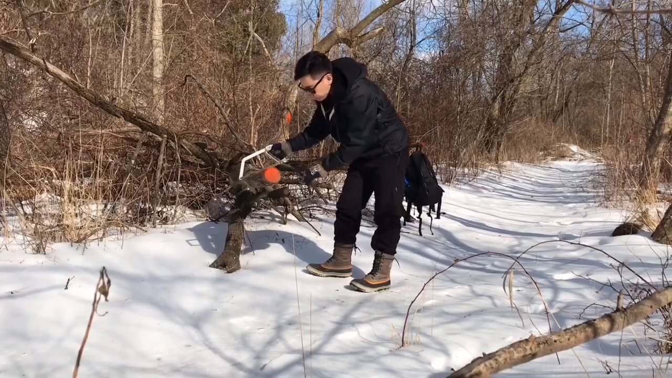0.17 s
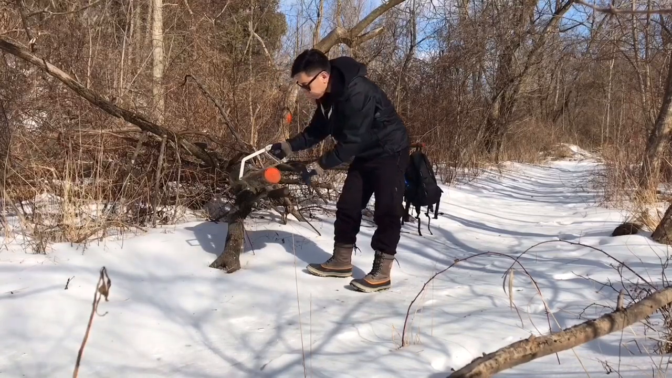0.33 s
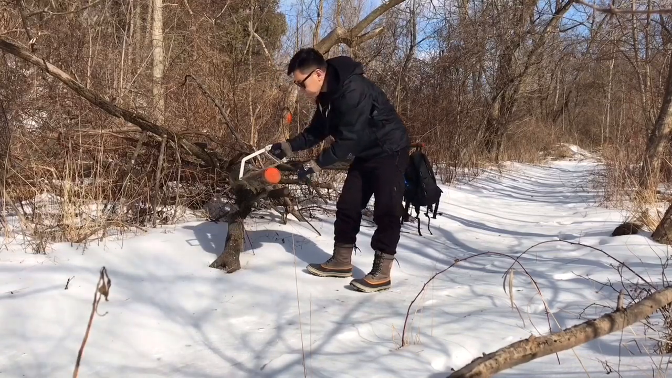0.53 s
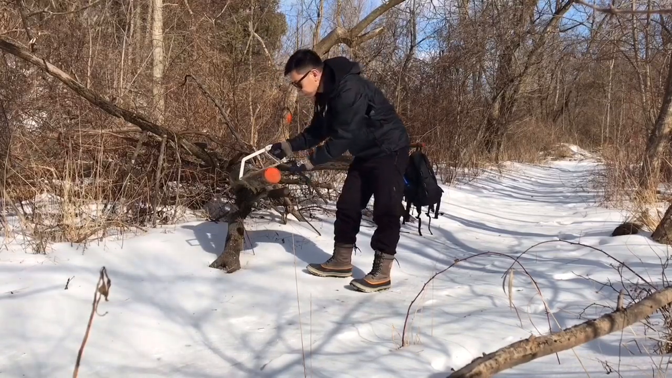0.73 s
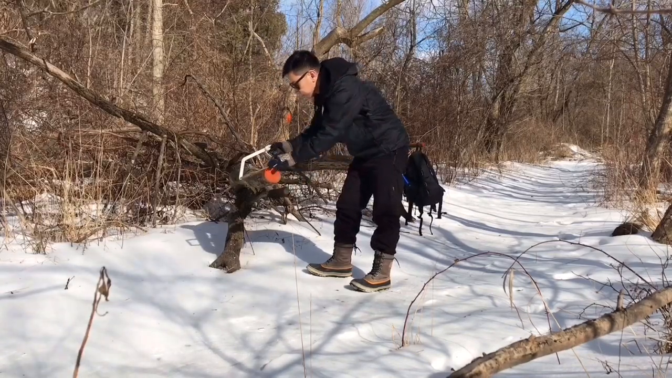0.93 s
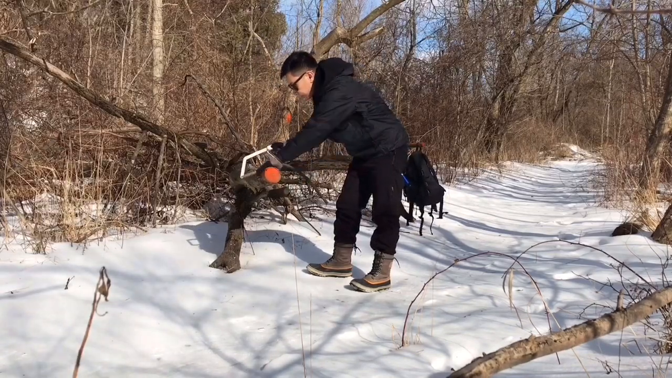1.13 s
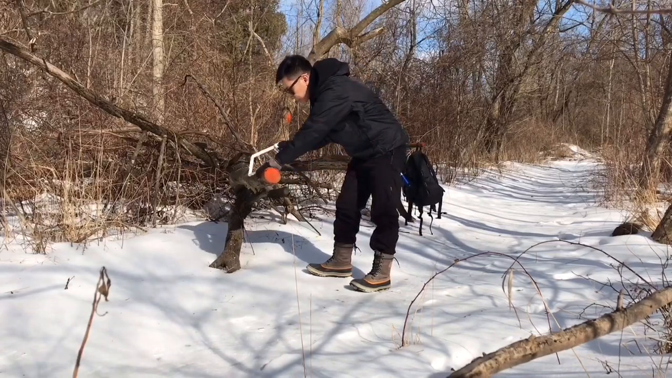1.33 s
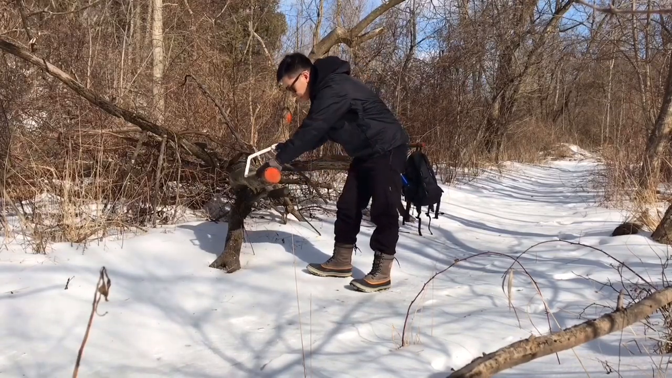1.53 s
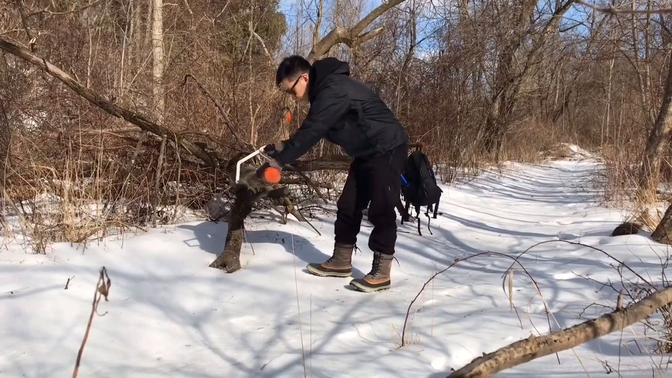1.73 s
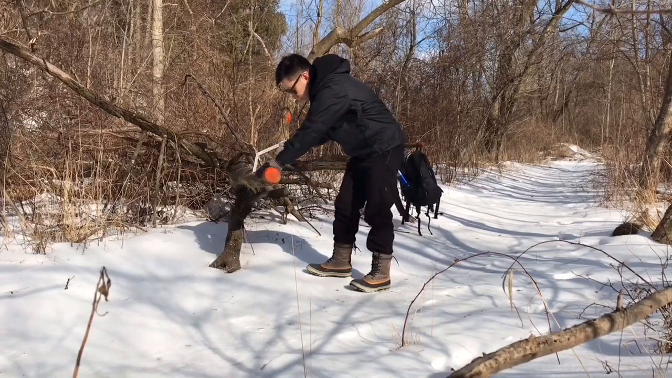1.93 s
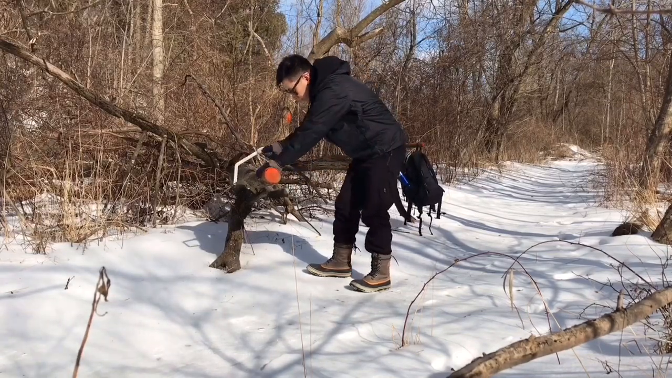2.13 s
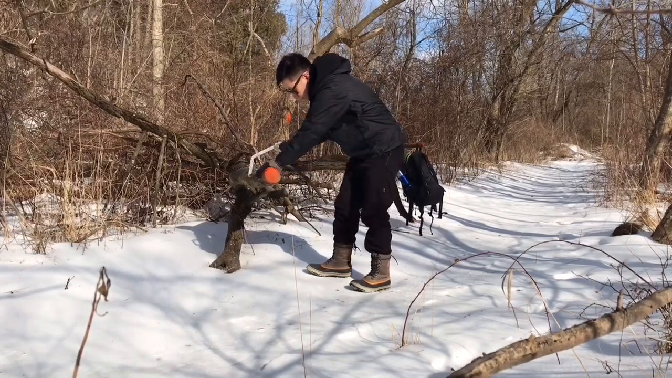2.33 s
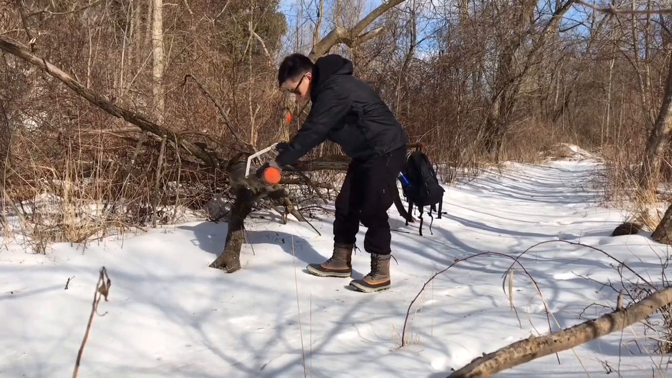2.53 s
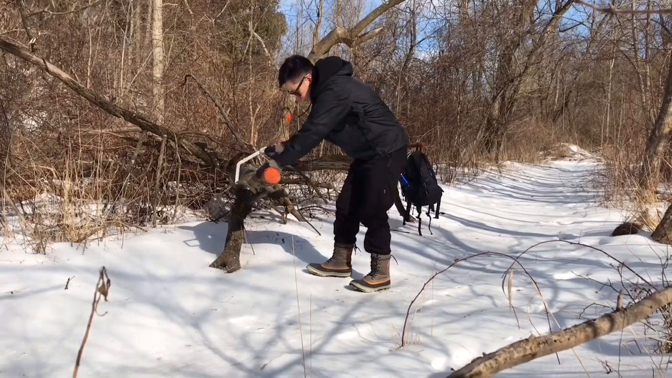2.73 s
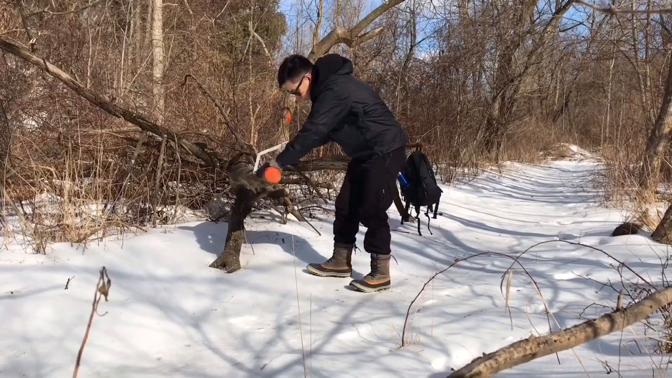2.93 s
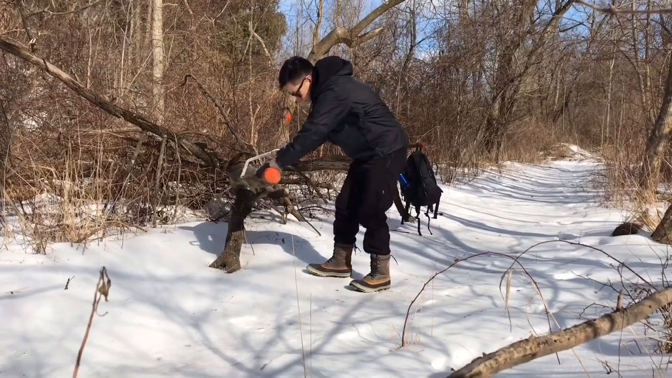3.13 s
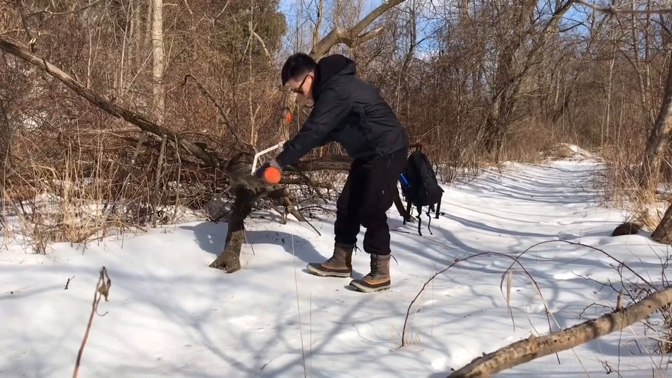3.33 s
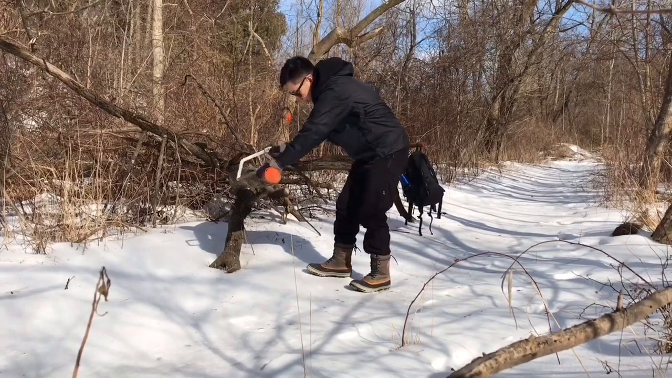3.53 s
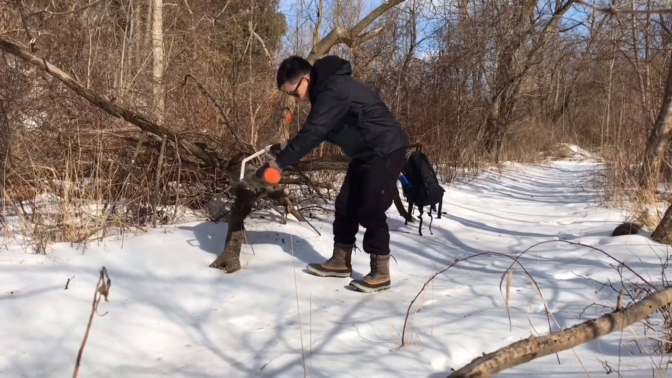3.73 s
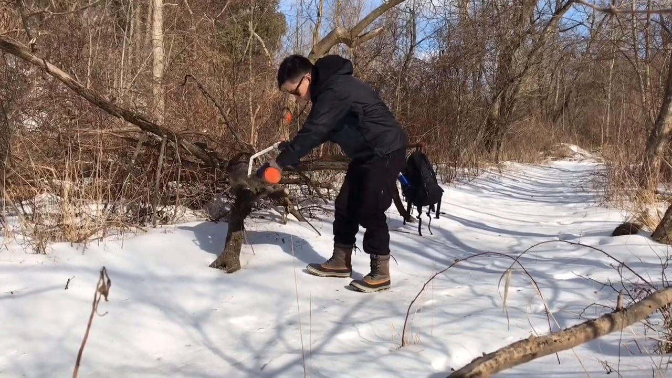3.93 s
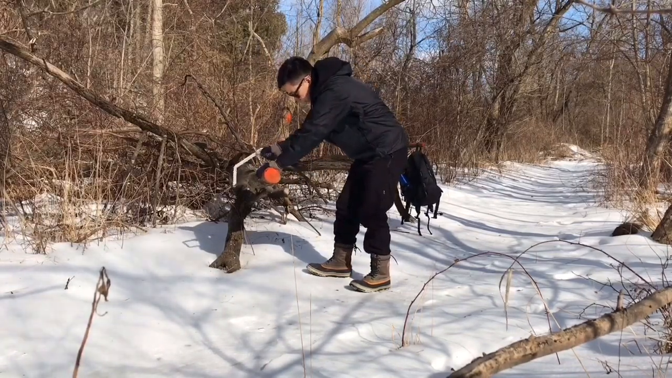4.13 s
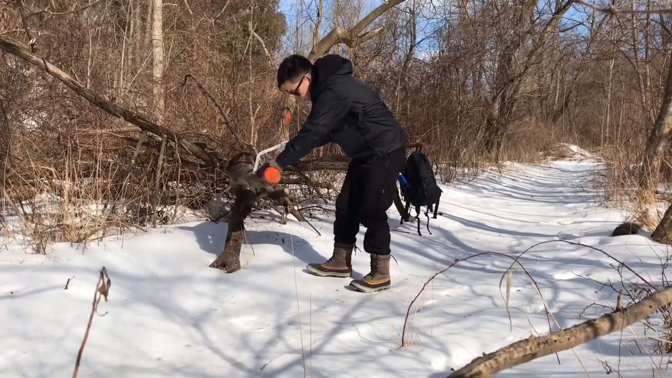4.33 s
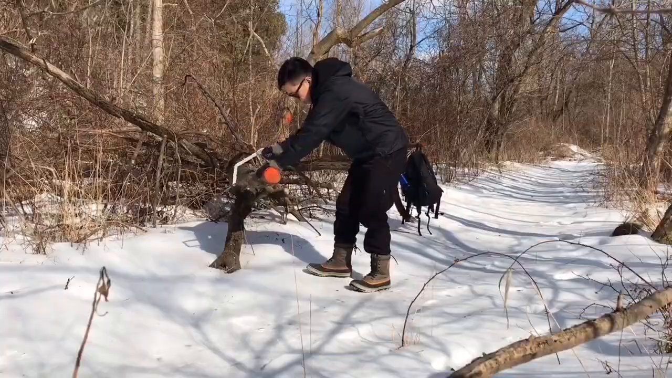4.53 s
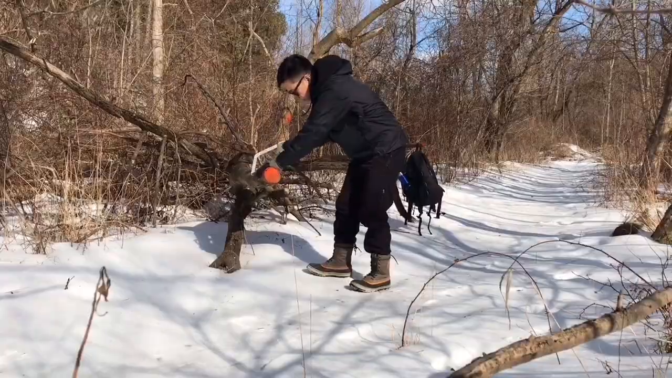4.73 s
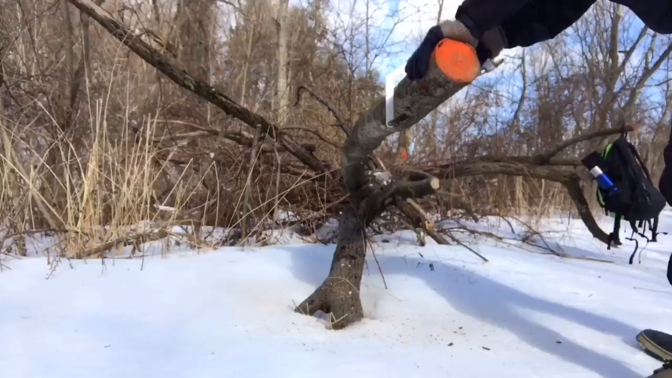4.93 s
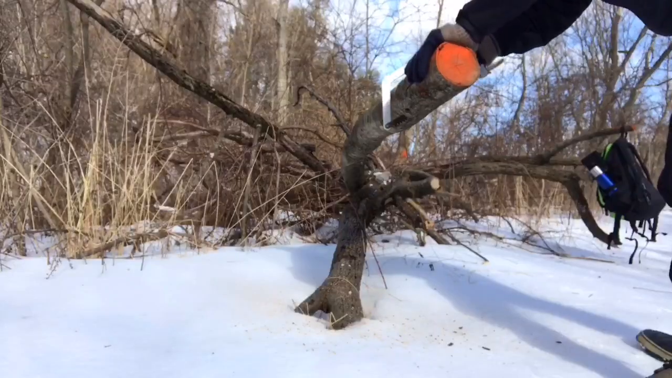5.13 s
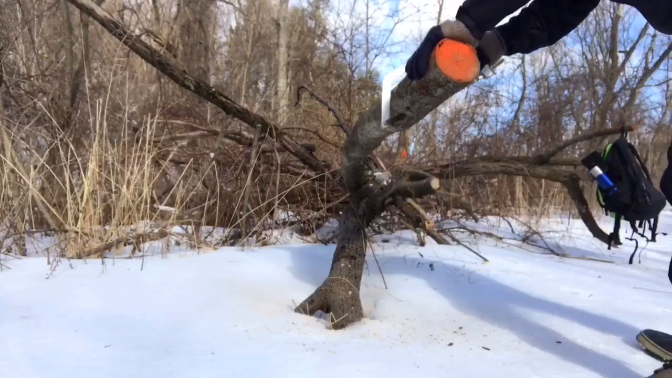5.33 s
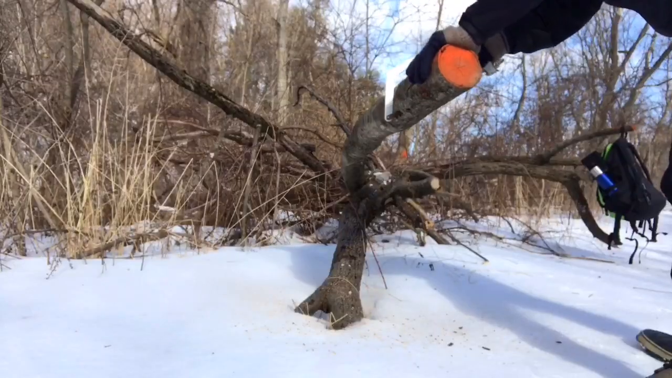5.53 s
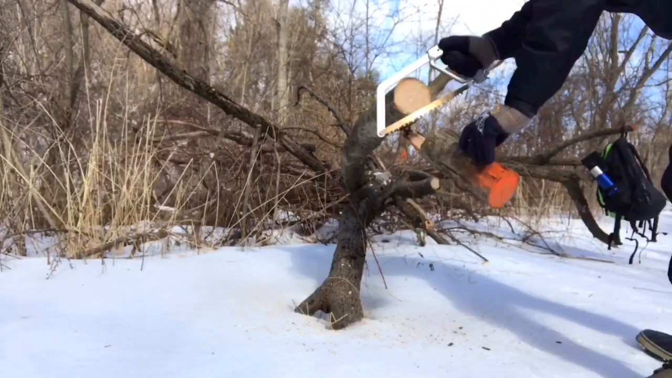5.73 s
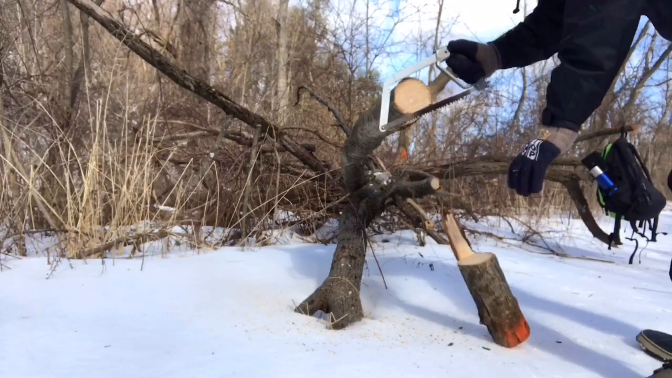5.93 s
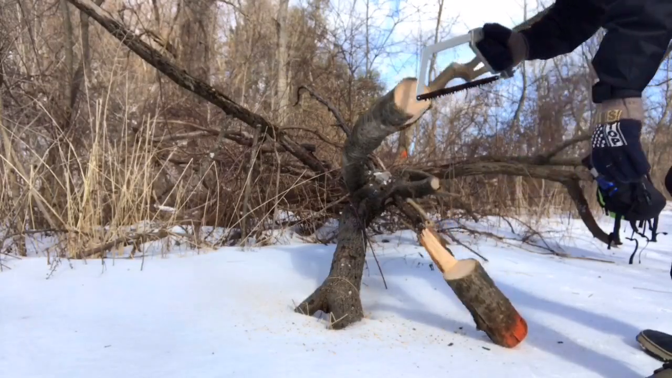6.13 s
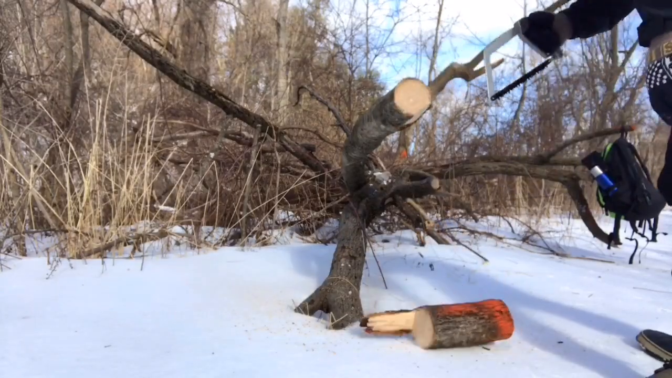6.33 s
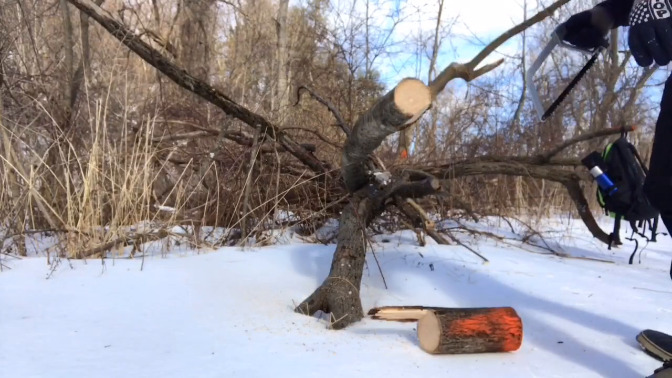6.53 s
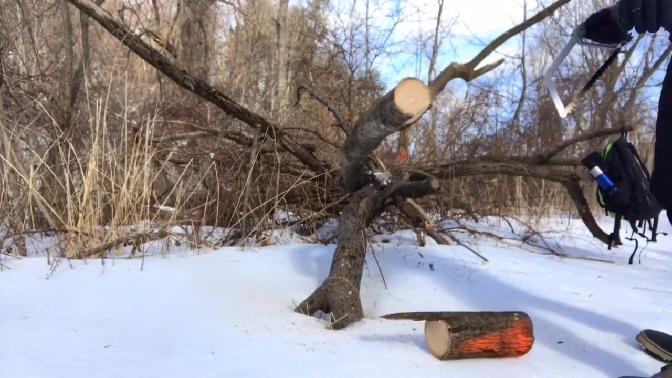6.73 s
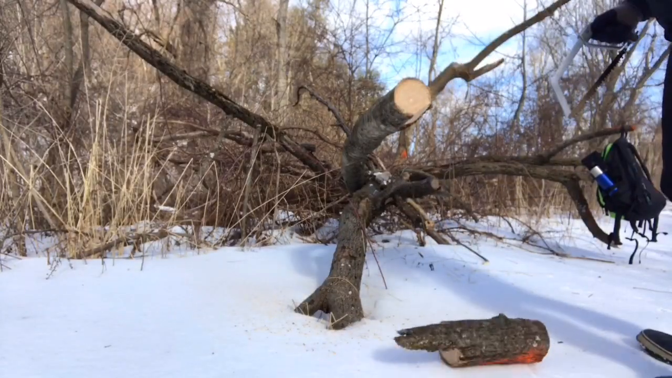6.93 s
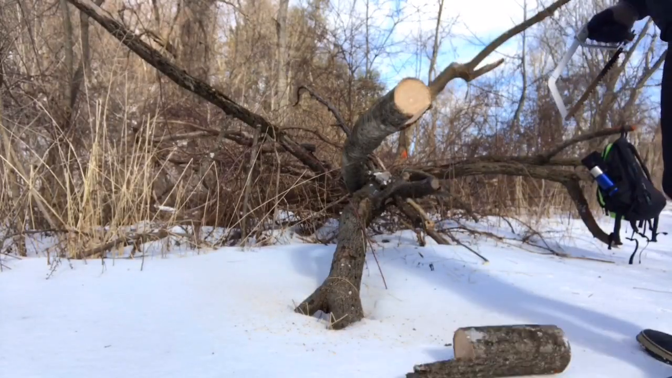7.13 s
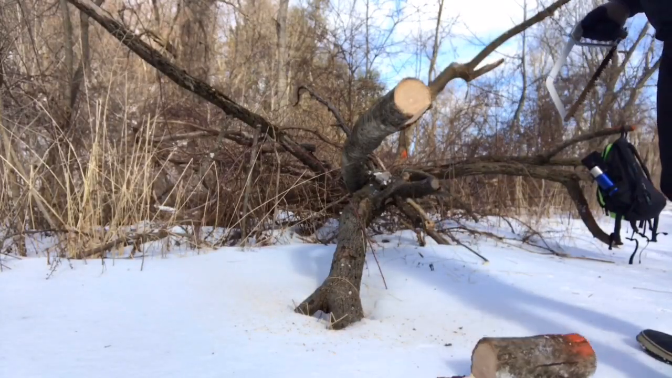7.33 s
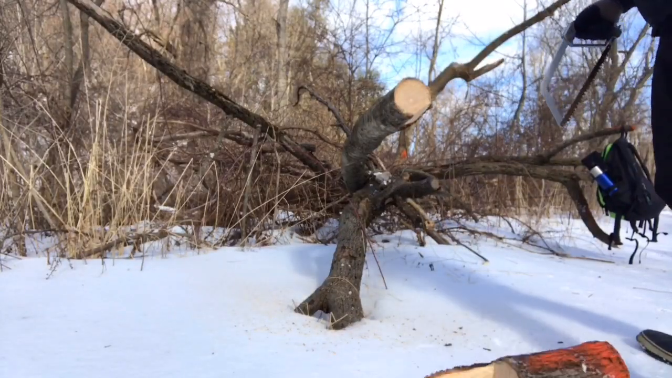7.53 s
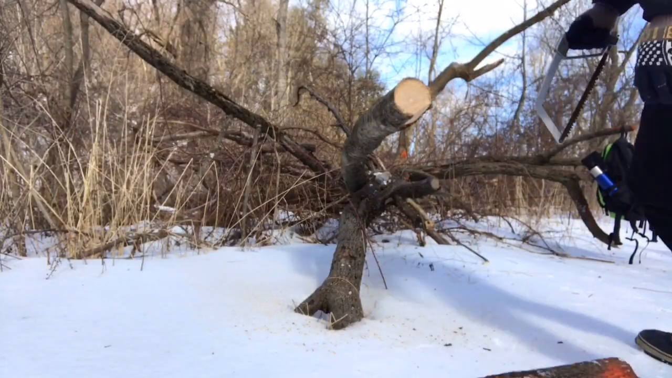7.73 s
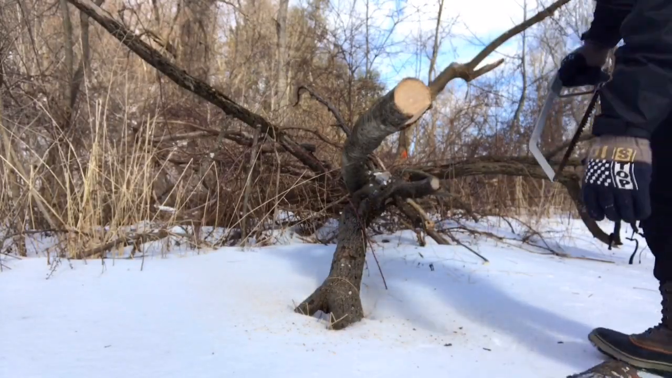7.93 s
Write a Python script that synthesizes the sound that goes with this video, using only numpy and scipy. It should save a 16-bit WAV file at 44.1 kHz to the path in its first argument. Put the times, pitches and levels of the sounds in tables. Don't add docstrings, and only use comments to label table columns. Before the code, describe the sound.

Quiet outdoor air with low wind rumble and a distant road, then a hand saw bites dry wood in fast, even, metallic strokes, with a brief pause midway. Closer, the blade binds with scrapes and hollow knocks, and the branch splinters and snaps very loudly. The log thuds onto snow, bounces and rolls with hiss and small cracks. Close dry microphone, faint woodland tail.

```python
import sys
import numpy as np
from scipy import signal
from scipy.fft import rfft, irfft, next_fast_len
from scipy.io import wavfile
from scipy.ndimage import map_coordinates

SR = 44100
rng = np.random.default_rng(int(sys.argv[2]) if len(sys.argv) > 2 else 0)


def wav_record(signal):
    frames = np.transpose(np.atleast_2d(signal))
    bounded = np.clip(frames, -1, 1)
    quanta = np.round(bounded * 32767).astype(np.int16)
    wavfile.write(sys.argv[1], SR, quanta)


def elevation(decibels):
    levels = np.asarray(decibels, float)
    return 10 ** (levels / 20)


N = 355887
TIME = np.arange(N) / SR


def unit(x):
    return x / np.sqrt(np.mean(x ** 2) + 1e-20)


def along(points, hz):
    f, v = np.transpose(points)
    return np.interp(np.log(hz + 1), np.log(f + 1), v)


def curves(tables, fade_s):
    rows = []
    for table in tables:
        first, last = table[0], table[-1]
        rows.append((first[0] - fade_s, first[1] - 30, *first[2:]))
        rows += table
        rows.append((last[0] + fade_s, last[1] - 30, *last[2:]))
    s, *columns = np.transpose(sorted(rows))
    return [np.interp(TIME, s, column) for column in columns]


def wobble(rate_hz):
    knots = rng.standard_normal(int(N * rate_hz / SR) + 4)
    return map_coordinates(knots, [TIME * rate_hz])


def filtered(x, response):
    m = next_fast_len(len(x) + SR // 4)
    return irfft(rfft(x, m) * response(np.fft.rfftfreq(m, 1 / SR)), m)[:len(x)]


def tinted(x, spectrum):
    return unit(filtered(x, lambda hz: elevation(along(spectrum, hz))))


def resonant(x, peaks):
    def response(hz):
        total = 0
        for k, (centre_hz, width_hz, db) in enumerate(peaks):
            damping = 1j * hz * width_hz
            total = total + (-1) ** k * elevation(db) * damping / (centre_hz ** 2 - hz ** 2 + damping)
        return total
    return unit(filtered(x, response))


def grit(rate_hz, spread_db):
    hits = rng.random(N) < rate_hz / SR
    return hits * rng.standard_normal(N) * elevation(spread_db * rng.standard_normal(N))


def band(x, lo_hz, hi_hz):
    edges_hz = [lo_hz, min(hi_hz, SR / 2.1)]
    return signal.sosfilt(signal.butter(2, edges_hz, "band", fs=SR, output="sos"), x)


# (time [s], rumble level [dB], road level [dB])
AIR_LEVELS = [(0.0, -54, -61), (0.36, -53, -61), (2.43, -57, -59), (3.46, -53, -59), (4.0, -54, -59),
              (4.92, -52, -58), (5.06, -47, -59), (5.33, -48, -62), (5.64, -46, -61), (5.98, -51, -60),
              (6.25, -49, -59), (6.59, -52, -61), (6.85, -49, -62), (7.53, -51, -63), (7.8, -54, -57),
              (8.07, -49, -54)]
# (frequency [Hz], level [dB])
RUMBLE_SPECTRUM = [(15, -36), (25, -6), (54, 0), (108, -3), (156, -14), (194, -15), (216, -22), (260, -19),
                   (340, -49), (570, -120)]
# (frequency [Hz], level [dB])
ROAD_SPECTRUM = [(82, -30), (140, 0), (217, -10), (303, -8), (488, -18), (550, -14), (726, -19), (851, -15),
                 (1170, -17), (1400, -26), (1880, -24), (2790, -37), (16000, -54)]
# (time [s], level [dB])
HUM_LEVELS = [(4.8, -57), (4.86, -51), (5.22, -45), (5.33, -51), (5.45, -47), (6.41, -51), (6.49, -61),
              (6.56, -52), (6.98, -47), (7.12, -50), (7.62, -51), (7.67, -56), (7.98, -48), (8.07, -51)]


def air():
    rumble_db, road_db = curves([AIR_LEVELS], fade_s=.1)
    hum_db, = curves([HUM_LEVELS], fade_s=.05)
    rumble = unit(elevation(2.5 * wobble(9)) * tinted(rng.standard_normal(N), RUMBLE_SPECTRUM))
    road = elevation(.7 * wobble(3)) * tinted(rng.standard_normal(N), ROAD_SPECTRUM)
    hum_hz = 51 + 3 * wobble(8)
    hum = np.sqrt(2) * np.sin(2 * np.pi * np.cumsum(hum_hz) / SR)
    return elevation(rumble_db + 1.5) * rumble + elevation(road_db + 1.5) * road + elevation(hum_db - 1.5) * hum


# (frequency [Hz], t60 [s])
WOODS_DECAY = [(200, .5), (2000, .5), (12000, .25)]


def woods(x):
    hz, t, z = signal.stft(rng.standard_normal(SR // 2), SR, nperseg=256)
    decay = elevation(-60 * t / along(WOODS_DECAY, hz)[:, None])
    tail = signal.istft(z * decay, SR, nperseg=256)[1]
    delayed = np.pad(x, (300, 0))
    return signal.fftconvolve(delayed, tail / np.linalg.norm(tail))[:N]


# (time [s], hiss level [dB], body over hiss [dB])
SCRAPES = [
    [(4.965, -65, -4), (5.059, -65, 25), (5.135, -65, -7), (5.165, -66, 21), (5.201, -68, -8),
     (5.241, -70, 9), (5.437, -71, -9), (5.489, -71, 28), (5.565, -71, -7), (5.66, -71, 1)],
    [(5.76, -67, 31), (5.81, -64, 10), (5.82, -63, 25), (5.87, -63, -2), (5.92, -63, -13), (5.98, -63, 2),
     (5.98, -63, 37), (6.02, -63, 0), (6.39, -62, 3), (6.4, -63, 24), (6.42, -64, 8), (6.56, -67, -4),
     (6.58, -67, 13), (6.61, -67, -3), (6.79, -69, 6), (6.92, -69, -9), (7.1, -68, 18), (7.15, -66, -8),
     (7.48, -66, -10), (7.49, -66, 10), (7.64, -66, -11), (7.67, -65, 11), (7.82, -64, 9), (7.84, -64, 0),
     (7.99, -61, 12), (8.07, -60, 2)],
]
# (frequency [Hz], level [dB])
GRIT_SPECTRUM = [(1180, -32), (2000, -2), (3430, -2), (4860, -9), (6700, -8), (10200, -17), (14900, -15),
                 (16000, -22)]


def scrape():
    hiss_db, body_db = curves(SCRAPES, fade_s=.015)
    clumps = elevation(3 * wobble(45))
    hiss = unit(clumps * tinted(grit(rate_hz=5000, spread_db=4), GRIT_SPECTRUM))
    body = unit(clumps * band(grit(rate_hz=3000, spread_db=3), lo_hz=450, hi_hz=2400))
    return elevation(hiss_db + .1) * hiss + elevation(hiss_db + body_db - 3) * body


# (time [s], peak level [dB], frequency [Hz])
SNOW_THUDS = [
    (4.436, -35, 72.7),
    (5.747, -35, 116),
    (5.987, -30, 143),
    (6.403, -29, 143),
    (7.763, -39, 51.1),
]


def thuds():
    out, t = np.zeros(N + SR), TIME[:SR // 4]
    for s, db, hz in SNOW_THUDS:
        out[round(s * SR):][:len(t)] -= elevation(db + 4 - 60 * t * hz / 4) * np.sin(2 * np.pi * hz * t)
    return out[:N]


# (time [s], peak level [dB], t60 [s])
LIMB_KNOCKS = [
    (5.054, -25, 0.08),
    (5.483, -27, 0.08),
    (5.726, -15, 0.08),
    (5.747, -15, 0.08),
    (5.984, -23, 0.08),
    (6.403, -28, 0.08),
    (7.705, -32, 0.08),
    (7.763, -39, 0.08),
]
# (frequency [Hz], level [dB], t60 [s])
LIMB_MODES = [(205, -14, 0.25), (318, -8, 0.18), (420, -2, 0.066), (522, 0, 0.055), (608, -9, 0.071),
              (689, -16, 0.13), (1561, -34, 0.43)]


def knocks():
    out, t = np.zeros(N + SR), TIME[:SR // 4]
    for s, peak_db, t60_s in LIMB_KNOCKS:
        ring = np.zeros(len(t))
        for hz, mode_db, mode_t60_s in LIMB_MODES:
            decay_db = 60 * t / np.sqrt(t60_s * mode_t60_s)
            level = elevation(mode_db + rng.normal(0, 2.5) - decay_db)
            ring += level * np.sin(2 * np.pi * hz * rng.normal(1, .03) * t)
        rise = 1 - np.exp(-t / .001)
        out[round(s * SR):][:len(t)] += elevation(peak_db + .1) * ring * rise / np.abs(ring).max()
    return out[:N]


# (time [s], level [dB], treble over it [dB])
SPLINTERING = [
    (5.66, -66, 2),
    (5.68, -66, 2),
    (5.724, -65, 40),
    (5.79, -64, 11),
]
# (frequency [Hz], width [Hz], level [dB])
FIBRE_MODES = [(1920, 42, 0), (3590, 39, -10), (4890, 28, -15), (5580, 89, -14), (6640, 120, -14)]


def splinter():
    db, treble_db = curves([SPLINTERING], fade_s=.012)
    ticks = elevation(4 * wobble(250)) * grit(rate_hz=2500, spread_db=5)
    treble = unit(band(ticks, lo_hz=4500, hi_hz=15500))
    return elevation(db + .1) * resonant(ticks, FIBRE_MODES) + elevation(db + treble_db + .1) * treble


# (time [s], peak level [dB], treble over it [dB], t60 [s])
SNAPS = [(5.0534, -35, -17, 0.012), (5.1642, -37, -10, 0.012), (5.1804, -42, -15, 0.012),
         (5.252, -38, -14, 0.012), (5.2654, -45, -7, 0.012), (5.3044, -52, -13, 0.012),
         (5.3234, -55, -10, 0.012), (5.4854, -44, -26, 0.012), (5.6925, -20, -11, 0.012),
         (5.7099, -17, -11, 0.012), (5.7184, -3, -9, 0.012), (5.7259, -14, 2, 0.012),
         (5.7256, -1, -10, 0.012), (5.7461, -4, -5, 0.012), (5.7962, -34, 0, 0.012),
         (5.8242, -38, 4, 0.012), (5.8242, -24, -10, 0.012), (5.8284, -26, -14, 0.012),
         (5.8344, -26, -14, 0.012), (5.986, -10, -14, 0.012), (6.1844, -51, -9, 0.012),
         (6.2672, -44, -12, 0.012), (6.3589, -32, -10, 0.012), (6.4026, -16, -11, 0.012),
         (6.4383, -38, -5, 0.012), (6.4901, -48, -17, 0.012), (6.57, -44, -12, 0.012),
         (6.6732, -47, -10, 0.012), (6.8004, -41, -15, 0.012), (7.0005, -33, -11, 0.012),
         (7.0249, -47, -8, 0.012), (7.2025, -38, -9, 0.012), (7.2679, -50, -9, 0.012),
         (7.3088, -45, -11, 0.012), (7.3342, -48, -14, 0.012), (7.4949, -22, -17, 0.012),
         (7.5114, -41, -8, 0.012), (7.5204, -41, -7, 0.012), (7.5348, -34, -13, 0.012),
         (7.5714, -52, -4, 0.012), (7.664, -45, -7, 0.012), (7.6934, -50, -1, 0.012),
         (7.764, -38, -5, 0.012), (7.8032, -41, -11, 0.012), (7.9414, -40, -12, 0.012),
         (7.9838, -39, -17, 0.012), (8.0361, -37, -19, 0.012)]


def cracks():
    out, t = np.zeros(N + SR), TIME[:3000]
    rise = 1 - np.exp(-(t / .0008) ** 2)
    for s, db, treble_db, t60_s in SNAPS:
        low_noise, high_noise = rng.standard_normal((2, len(t)))
        low = unit(band(low_noise, lo_hz=1200, hi_hz=5000)) * elevation(-60 * t / max(t60_s, .002))
        high_decay = elevation(treble_db - 60 * t / max(.8 * t60_s, .002))
        high = unit(band(high_noise, lo_hz=5000, hi_hz=16800)) * high_decay
        out[round((s - .0006) * SR):][:len(t)] += elevation(db + .1) * rise * (low + high)
    return out[:N]


# (time [s], blade level [dB], wood over blade [dB])
SAW_STROKES = [
    [(1.473, -56, 0), (1.503, -43, -12), (1.541, -51, -6), (1.559, -67, 6)],
    [(1.634, -57, -12), (1.642, -49, -7), (1.654, -46, -11), (1.699, -57, 0)],
    [(1.782, -55, -7), (1.828, -42, -11), (1.878, -47, -5), (1.905, -63, -2)],
    [(1.95, -56, -7), (1.958, -52, -4), (2.016, -44, -13), (2.06, -57, -1)],
    [(2.107, -56, -3), (2.131, -37, -16), (2.219, -50, -3), (2.246, -67, 0)],
    [(2.285, -55, -4), (2.303, -46, -13), (2.349, -47, -8), (2.392, -59, -5)],
    [(2.426, -57, -5), (2.478, -40, -12), (2.536, -47, -5), (2.55, -42, -14), (2.577, -65, 3)],
    [(2.622, -54, -6), (2.658, -43, -8), (2.692, -48, -6), (2.719, -59, -5)],
    [(2.766, -58, -2), (2.774, -48, -10), (2.836, -43, -5), (2.886, -48, -7), (2.912, -64, 1)],
    [(2.941, -62, 2), (2.949, -48, -16), (3.005, -44, -9), (3.054, -58, -4)],
    [(3.111, -54, -9), (3.155, -43, -6), (3.177, -38, -15), (3.218, -63, 3)],
    [(3.31, -57, -10), (3.34, -55, -8), (3.355, -66, -3)],
    [(3.47, -60, -3), (3.496, -44, -9), (3.592, -52, -7), (3.609, -71, 8)],
    [(3.654, -54, -8), (3.684, -47, -7), (3.736, -53, -6), (3.752, -60, -1)],
    [(3.819, -59, -10), (3.831, -40, -13), (3.923, -51, -5), (3.942, -67, 8)],
    [(3.991, -58, -7), (4.013, -45, -9), (4.093, -53, -8), (4.11, -66, 0)],
    [(4.161, -57, -6), (4.199, -37, -15), (4.259, -49, -6), (4.281, -66, 2)],
    [(4.336, -59, -8), (4.346, -49, -9), (4.42, -53, -5), (4.437, -58, -2)],
    [(4.51, -56, -10), (4.528, -44, -13), (4.598, -43, -9), (4.636, -57, -4)],
    [(4.693, -59, -7), (4.705, -47, -12), (4.777, -53, -3), (4.794, -57, -4)],
    [(4.877, -60, -4), (4.887, -45, -10), (4.929, -42, -12), (4.954, -67, -12)],
]
# (time [s], peak level [dB])
TOOTH_BITES = [(1.4981, -32), (1.6248, -40), (1.6443, -35), (1.768, -43), (1.7889, -38), (1.8224, -29),
               (1.983, -34), (2.1142, -30), (2.1247, -25), (2.2948, -33), (2.432, -38), (2.4634, -30),
               (2.4734, -27), (2.5452, -33), (2.6265, -42), (2.63, -35), (2.659, -30), (2.7737, -36),
               (2.7927, -33), (2.8106, -29), (2.8361, -31), (2.9473, -37), (2.9628, -30), (3.1234, -33),
               (3.1464, -28), (3.1733, -26), (3.314, -43), (3.4766, -36), (3.4946, -33), (3.6787, -35),
               (3.8178, -30), (3.8288, -28), (3.9964, -35), (4.0124, -33), (4.1675, -33), (4.1985, -25),
               (4.3416, -39), (4.3995, -37), (4.5242, -33), (4.5986, -31), (4.7013, -36), (4.8849, -34),
               (4.9014, -29), (4.9283, -30)]
# (frequency [Hz], width [Hz], level [dB])
BLADE_MODES = [(2980, 44, -10), (3350, 100, -13), (4370, 180, -8), (6160, 79, -2), (6440, 82, -3),
               (7300, 110, -5), (7700, 70, -5), (8070, 56, -10), (8860, 54, -6), (9240, 61, -4),
               (9660, 47, -14), (10200, 340, -12), (10900, 160, -11), (11700, 180, -8), (13400, 200, -3),
               (13800, 47, -4), (15000, 46, -8), (15400, 110, 0)]
# (frequency [Hz], level [dB])
KERF_SPECTRUM = [(1500, -120), (2200, -6), (4000, -4), (6500, 0), (10000, -6), (13500, -1), (15500, -2)]
# (frequency [Hz], width [Hz], level [dB])
BRANCH_MODES = [(760, 70, -7), (1010, 70, -7), (1700, 60, 0), (1300, 1500, -16)]


def saw():
    blade_db, wood_db = curves(SAW_STROKES, fade_s=.035)
    chatter = elevation(2.5 * wobble(70) + 2 * wobble(300))
    teeth = elevation(blade_db) * unit(chatter * grit(rate_hz=9000, spread_db=3))
    for s, db in TOOTH_BITES:
        at = round(s * SR)
        teeth[at:at + 500] += elevation(db - 9 - 60 * TIME[:500] / .025) * rng.standard_normal(500)
    teeth_rms = np.sqrt(np.mean(teeth ** 2))
    ringing = elevation(-4) * resonant(teeth, BLADE_MODES)
    tearing = elevation(-3) * tinted(teeth, KERF_SPECTRUM)
    push = teeth * elevation(wood_db)
    push_rms = np.sqrt(np.mean(push ** 2))
    return teeth_rms * (ringing + tearing) + elevation(-1) * push_rms * resonant(push, BRANCH_MODES)


def scene():
    near = scrape() + thuds() + knocks() + splinter() + cracks() + saw()
    return (air() + elevation(-22) * woods(near) + near)[None]


def top_cut(x):
    return signal.sosfilt(signal.butter(12, 16990, fs=SR, output="sos"), x)


def record(dry):
    mix = dry / (1 + np.abs(dry / .99) ** 6) ** (1 / 6)
    return top_cut(mix)


dry = scene()
out = record(dry)
wav_record(out)
```